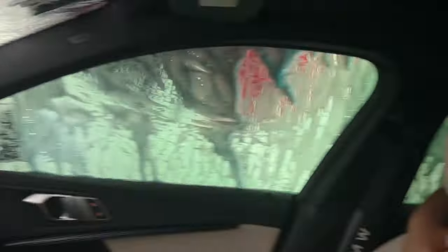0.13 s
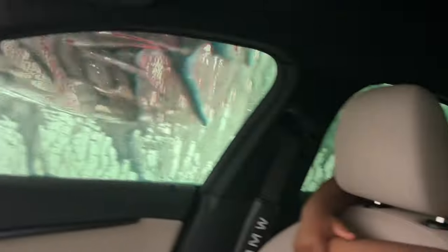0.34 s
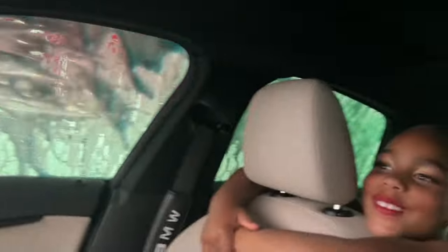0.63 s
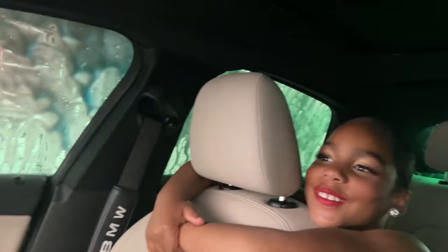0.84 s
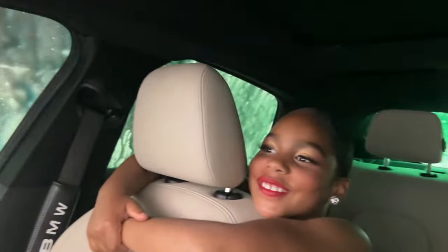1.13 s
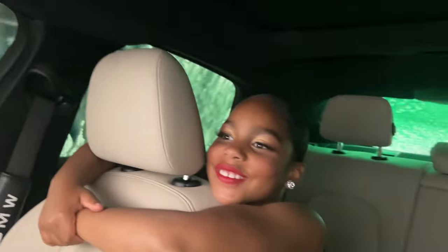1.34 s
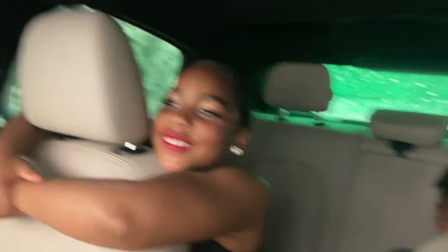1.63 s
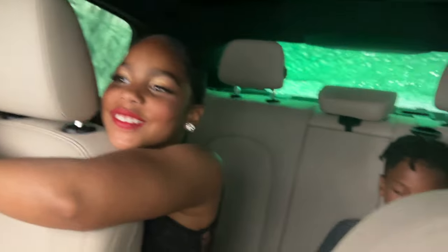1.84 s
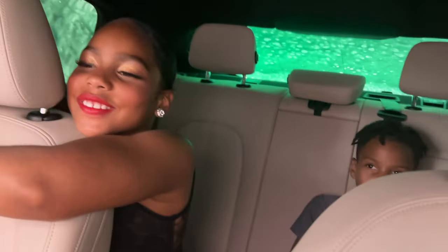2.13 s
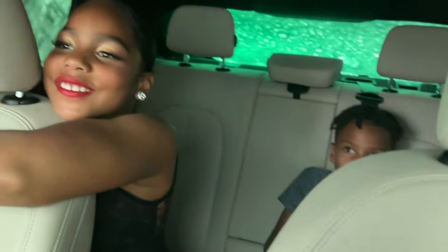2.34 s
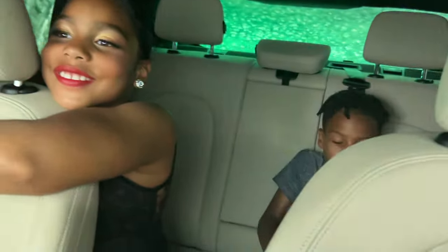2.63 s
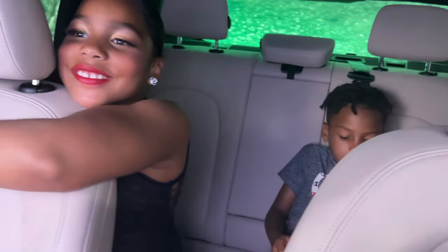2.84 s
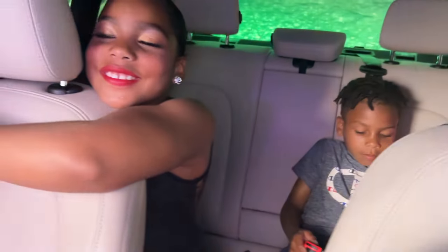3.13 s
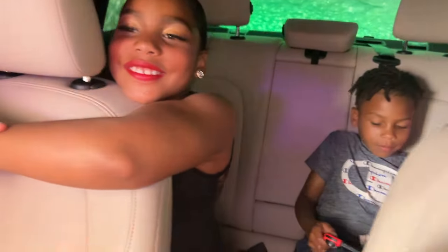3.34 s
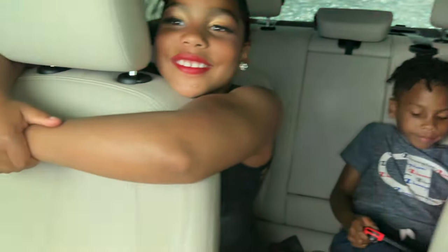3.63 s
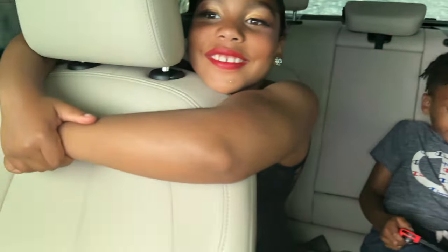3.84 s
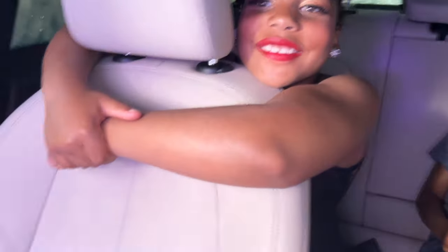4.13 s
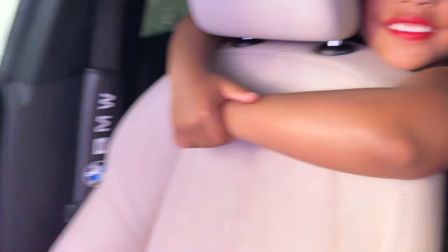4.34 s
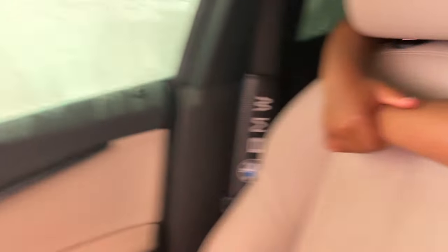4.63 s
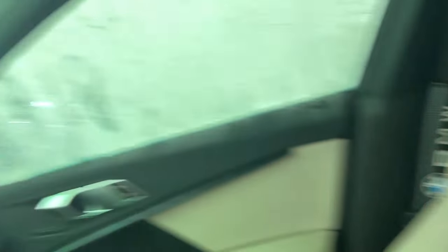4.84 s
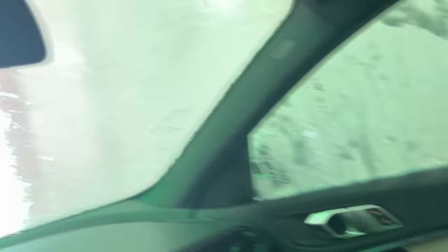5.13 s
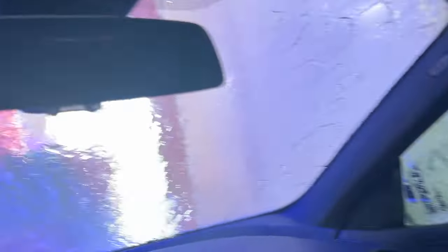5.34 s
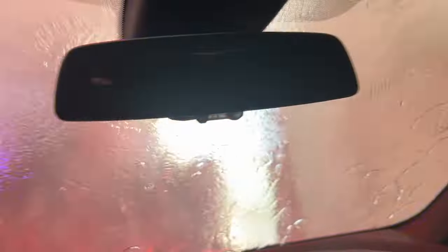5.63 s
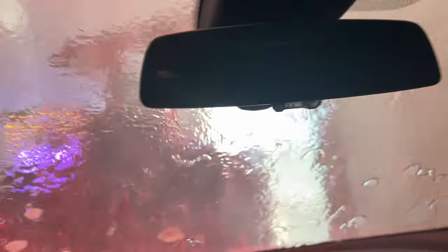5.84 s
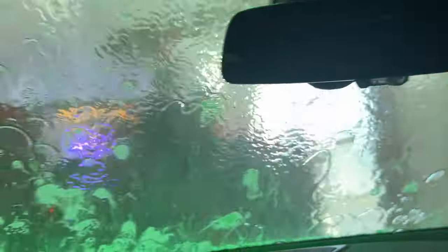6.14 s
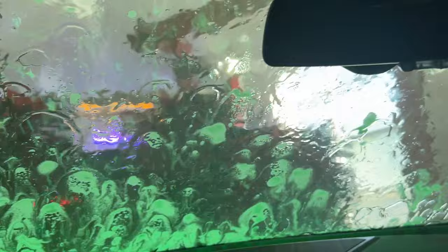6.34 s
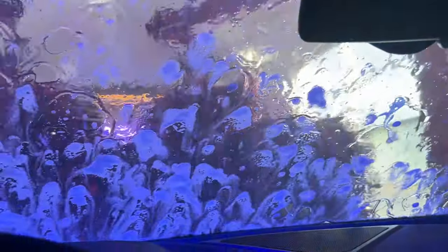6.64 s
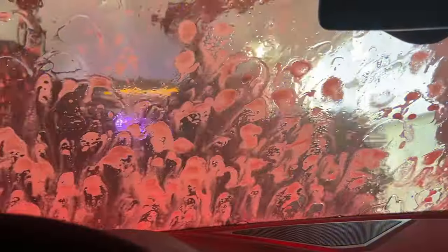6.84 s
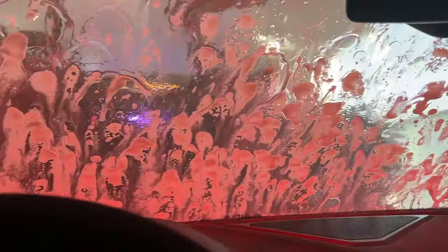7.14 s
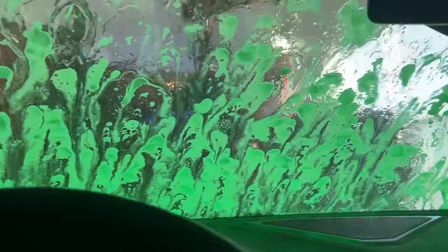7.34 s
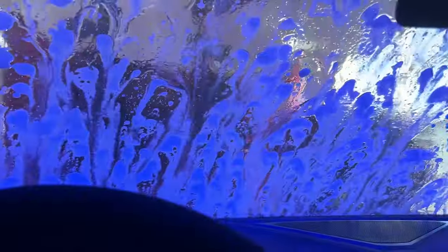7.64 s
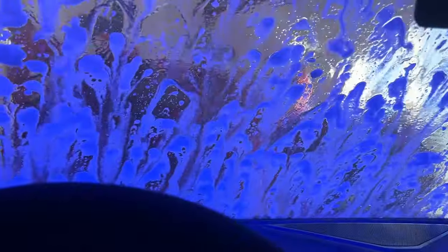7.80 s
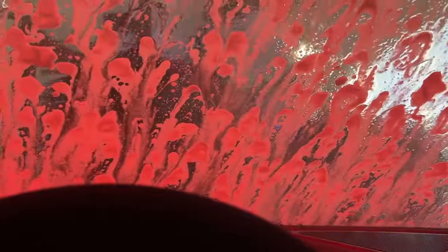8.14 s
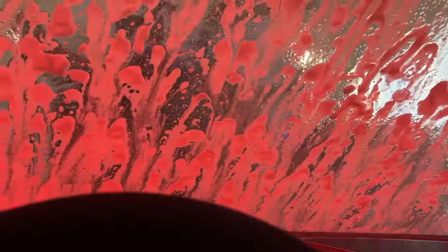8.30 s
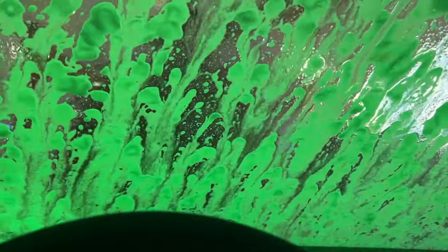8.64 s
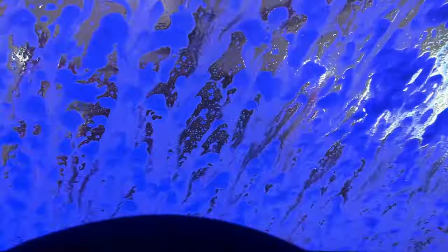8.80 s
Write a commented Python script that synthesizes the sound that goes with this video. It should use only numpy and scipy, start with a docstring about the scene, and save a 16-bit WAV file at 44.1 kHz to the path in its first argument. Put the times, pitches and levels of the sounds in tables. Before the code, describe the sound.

Close, enclosed car interior, handheld stereo microphone. Dull thuds of wet brushes open, then pulsing water jets rise and fall in a steady beat, with patter, splashes and fine hiss on the glass. An uneven motor-like hum sits underneath. Hollow resonant notes gather later, followed by more soft thumps, foam splats, tiny squeaks and a thin airy whistle on the left. The high hiss leans left.

```python
"""Inside a closed car in a wash tunnel, heard by a hand-held phone with two microphone ports that turns about.
Cloth slaps open over rumbling brushes (damped tones, filtered impacts); a side jet soon crosses the doors.
From 0.4 s spray sweeps the glass about once a second in dense random impacts, throbbing with the pump, whose
hum (multiples of its shaft rate) swells and breaks up, most strongly until 5.4 s. Hollow notes of narrow noise
start at 1.1 s and crowd near 5.7 s, with wet squeaks; slaps return at 6.1 s, then a foam nozzle whistles."""
import sys
import numpy as np
from scipy import signal
from scipy.fft import rfft, irfft, next_fast_len
from scipy.io import wavfile
from scipy.ndimage import uniform_filter1d, map_coordinates

SR = 44100
rng = np.random.default_rng(int(sys.argv[2]) if len(sys.argv) > 2 else 0)


def master_out(mix):
    """Clip the mix to full scale and print it as 16-bit PCM to the path in sys.argv[1]."""
    frames = np.transpose(np.atleast_2d(mix))
    ceiling = np.clip(frames, -1, 1)
    pcm = np.round(ceiling * 32767).astype(np.int16)
    wavfile.write(sys.argv[1], SR, pcm)


N = 395577

PUMP_HZ = 45.74  # mean shaft rate
# a swinging spray arm crosses the glass at a steady beat
FIRST_SWEEP_S, SWEEP_EVERY_S = 0.39, 1.02


def undb(db):
    """Amplitude ratio of a level difference: twenty decibels per factor of ten."""
    return 10 ** (np.asarray(db) / 20)


def unit(x):
    """Normalization to unit root-mean-square amplitude."""
    return x / np.sqrt(np.mean(x ** 2))


def curves(table):
    """Linear interpolation in time of every column after the first."""
    s, *columns = np.transpose(table)
    return [np.interp(np.arange(N) / SR, s, column) for column in columns]


def on_log(hz, table, column=1):
    """Interpolation of a table column along a logarithmic frequency axis."""
    points = np.array(table)
    return np.interp(np.log(np.maximum(hz, 1)), np.log(points[:, 0]), points[:, column])


def walk(rate):
    """Smoothed random modulation: levels held 1 / rate s, averaged twice; spread near 1."""
    held = int(SR / rate)
    steps = np.repeat(rng.standard_normal(N // held + 1), held)
    smooth = uniform_filter1d(uniform_filter1d(steps, held), held)
    return 1.333 * smooth[:N]


def pan(db):
    """Interchannel level difference: left minus right in dB, shared equally."""
    return undb(np.array([db, -db]) / 2)


def water(gain, drops_per_s, spread_db, flicker_db, flicker_rate, lag_s=None):
    """Shot noise of uneven impacts coloured by gain(hz), with partial coherence between the channels."""
    # f/Hz, coherence of the two channels (0-1), phase by which left leads/rad
    channel_likeness = [(40, 1, -0.091), (252, 0.8, 0.31), (513, 0.28, 0.51), (990, 0.16, 1),
                        (1850, 0, -1.14), (2960, 0.75, 1), (5500, 0.58, 0.67)]
    lagged_likeness = 0.97  # used when a time offset is given
    size = next_fast_len(N)
    hz = np.arange(size // 2 + 1) * SR / size
    hit = rng.random((2, N)) < drops_per_s / SR
    hit = hit * undb(spread_db * rng.exponential(size=(2, N)))
    mid, side = rfft(hit * rng.standard_normal((2, N)), size) * gain(hz)

    if lag_s:
        alike, lead = lagged_likeness, -2 * np.pi * hz * lag_s
    else:
        alike, lead = on_log(hz, channel_likeness), on_log(hz, channel_likeness, column=2)
    pair = np.sqrt(1 + alike) * mid + np.sqrt(1 - alike) * side * np.array([[1], [-1]])
    pair[0] *= np.exp(1j * lead)

    # overlapping octaves surge together and flicker alone
    power = np.abs(mid) ** 2
    octave = np.log2(np.maximum(hz, 1) / 30)
    surge = walk(flicker_rate)
    out = 0
    for k in range(10):
        share = np.cos(np.pi / 2 * np.clip(octave - k, -1, 1)) ** 2
        if np.sum(power * share) > 1e-3 * power.sum():  # skip nearly empty octaves
            flicker = flicker_db * (0.24 * surge + walk(1.5 * flicker_rate))
            out = out + irfft(pair * share, size)[:, :N] * undb(flicker)
    return unit(out)


def clumps(x, spread_db):
    """Spectro-temporal modulation: water lands in lumps, so patches of pitch and time swell and sink."""
    patch_hz, patch_s = 200, 0.028
    hz, t, spectrum = signal.stft(x, SR, nperseg=512)
    grid = np.meshgrid(hz / patch_hz, t / patch_s, indexing="ij")
    field = map_coordinates(rng.standard_normal((400, 1500)), grid, order=1, mode="wrap")
    return unit(signal.istft(spectrum * undb(spread_db * unit(field)), SR)[1][:, :N])


def ring(events, rise_s, t60_s, crack, sharpness, channels=2):
    """Damped resonance: each blow swells briefly, then a tone and noise in its band decay exponentially."""
    out, t = np.zeros((channels, N + SR)), np.arange(SR // 4) / SR
    shape = (1 - np.exp(-t / rise_s)) * np.exp(-np.log(1000) * t / t60_s)
    for s, db, hz in events:
        noise = rng.standard_normal((channels, len(t)))
        for _ in range(2):
            noise = signal.lfilter(*signal.iirpeak(hz, sharpness, fs=SR), noise)
        blow = (np.sin(2 * np.pi * hz * t) + crack * unit(noise)) / np.hypot(1, crack)
        start = int(s * SR)
        out[:, start:start + len(t)] += undb(db) * blow * shape
    return out[:, :N]


def band(hz, width_hz):
    """Narrow-band noise by quadrature modulation of a moving carrier; a narrow band holds as a tone."""
    held_hz = 11.7  # width at which the steady carrier has weight 1
    lowpass = signal.butter(2, width_hz / 2, fs=SR, output="sos")
    swing = unit(signal.sosfilt(lowpass, rng.standard_normal((2, N))))
    phase = 2 * np.pi * np.cumsum(hz) / SR
    return unit((swing[0] + (held_hz / width_hz) ** 2) * np.cos(phase) + swing[1] * np.sin(phase))


def glides(notes):
    """Frequency glides: each note swells, moves evenly in pitch and fades."""
    out = 0
    for s, length, first_hz, last_hz, width_hz, db in notes:
        along = np.clip((np.arange(N) / SR - s) / length, 0, 1)
        swell = np.sin(np.pi * along).clip(0) ** 0.28
        out = out + undb(db) * swell * band(first_hz + (last_hz - first_hz) * along, width_hz)
    return out


def hum(shaft, orders, waver_db, waver_rad):
    """Harmonic synthesis: multiples of the shaft rate waver in level and phase on their way through the body."""
    return sum(undb(db + waver_db * walk(8)) * np.sin(2 * np.pi * k * shaft + waver_rad * walk(5))
               for k, db in orders)


def pump(shaft):
    """Periodic forcing: three plungers on one shaft make its third multiple lead."""
    # multiple of shaft rate, relative level/dB
    plunger_orders = [(1, -21), (3, -1)]
    # the hum swells and breaks up: t/s, level/dB common to all multiples
    hum_level = [(0.0, -33.5), (1.62, -38), (1.87, -26), (1.92, -42), (2.02, -21), (2.22, -31),
                 (2.27, -49.5), (2.4, -25), (2.5, -28.5), (2.57, -45), (2.66, -24.5), (2.75, -33),
                 (2.82, -16.5), (3.0, -38.5), (3.05, -24), (3.4, -34), (3.62, -32.5), (3.7, -27),
                 (3.9, -23), (4.0, -42), (4.08, -26), (4.17, -38), (4.29, -29), (4.45, -38.5), (4.53, -25),
                 (4.6, -34.5), (4.94, -26.5), (5.04, -38), (5.12, -29), (5.27, -57), (5.32, -24.5),
                 (5.45, -43), (7.02, -37), (8.02, -42), (8.12, -30), (8.29, -37.5), (8.69, -37.5),
                 (8.82, -26), (8.97, -44)]
    db, = curves(hum_level)
    return np.sqrt(2) * hum(shaft, plunger_orders, 0.55, 0.48) * undb(db) * pan(-1.7)[:, None]


def brushes(pan_db):
    """Impact excitation: wet cloth beats a deep rumble from the shell and a duller roar from the doors."""
    # brushes on the body: t/s, deep rumble level/dB, door roar level/dB
    strokes = [(0.0, -20.5, -28), (0.3, -32.5, -26.5), (0.45, -29, -29), (0.95, -40, -26.5),
               (1.5, -33, -28.5), (2.2, -40, -28), (3.2, -34.5, -30), (4.2, -36, -29), (5.6, -33.5, -31),
               (6.15, -28.5, -30.5), (6.35, -29, -32), (7.15, -34, -31.5), (8.0, -35, -28.5),
               (8.97, -36.5, -31.5)]
    # spectrum of the shell: f/Hz, relative density level/dB
    body_colour = [(30, 6), (45, 10.5), (70, 9.5), (100, -1.5), (150, -18), (400, -60)]
    # spectrum of the doors: f/Hz, relative density level/dB
    door_colour = [(50, -19), (100, 2.5), (135, 2.5), (180, 0.5), (280, -11), (500, -7), (800, -19.5),
                   (1500, -21.5), (4000, -65)]
    # cloth slaps on the roof: t/s, level before the envelope/dB, f/Hz
    roof_slaps = [(0.008, -9, 325), (0.012, -11, 232), (0.138, -12, 95), (0.243, -12.5, 132),
                  (0.256, -13.5, 160), (0.284, -6.5, 80), (0.3, -10, 180), (0.302, -21, 320),
                  (0.318, -15, 129), (6.118, -13, 311), (6.246, -20, 80), (6.33, -10.5, 69),
                  (6.347, -11, 120), (6.519, -13, 125), (6.529, -11, 62), (6.554, -15, 360),
                  (6.752, -16, 99), (6.803, -14, 120), (6.97, -20, 110)]
    deep_db, doors_db = curves(strokes) + 1.2 * walk(14)  # both waver at the same moments
    deep = water(lambda hz: undb(on_log(hz, body_colour)), 3000, 2.2, 0.7, 9)
    doors = water(lambda hz: undb(on_log(hz, door_colour)), 6000, 1.43, 1.33, 9)
    slaps = ring(roof_slaps, 0.0018, 0.086, 0.24, 0.82)
    return undb(deep_db) * deep + undb(doors_db) * pan(pan_db) * doors + slaps


def splats(splash_gain):
    """Random damped impacts: stray lumps of water land at random, the higher ones weaker."""
    per_s, low_hz, octaves = 60, 480, 2.4
    top_db, spread_db = -1, 7.5  # relative to the splash, before the envelope
    when, size, pitch = rng.random((int(per_s * N / SR), 3)).T
    db = top_db - spread_db * size - 5.3 * octaves * pitch
    blows = zip(when * N / SR, db, low_hz * 2 ** (octaves * pitch))
    return splash_gain * ring(blows, 0.0099, 0.18, 0.9, 1.6)


def panel_notes():
    """Panel resonance: a hollow note glides or holds while the jet crosses a panel."""
    # start t/s, length/s, first f/Hz, last f/Hz, width/Hz, peak level/dB
    hollow_notes = [(1.1, 1.62, 270.8, 394.5, 38, -33.5), (1.75, 0.506, 365, 375, 32, -29),
                    (2.4, 0.276, 396, 380, 55, -31), (5.69, 0.178, 295, 355, 9, -24),
                    (5.64, 0.41, 276, 276, 5, -24), (5.66, 0.34, 230, 230, 5, -32),
                    (5.81, 0.2, 358, 374, 5, -23.5), (5.7, 0.46, 321, 321, 8, -31),
                    (6.18, 0.97, 355, 360, 53, -34.5), (6.2, 0.8, 960, 1010, 110, -39.5),
                    (5.6, 0.557, 500, 430, 55, -41), (6.9, 1.283, 560, 430, 100, -41.5)]
    return glides(hollow_notes)


def squeaks():
    """Brief narrow-band excitation: short wet squeaks of spray on the glass, stronger on the left."""
    # start t/s, length/s, first f/Hz, last f/Hz, width/Hz, peak level before panning/dB
    wet_notes = [(5.625, 0.047, 2110, 2100, 90, -41), (6.9, 0.11, 5800, 5560, 300, -50),
                 (6.99, 0.066, 4620, 4500, 250, -50), (7.54, 0.045, 1405, 1330, 400, -38.5),
                 (7.6, 0.043, 1230, 1190, 400, -36), (7.835, 0.05, 1454, 1460, 350, -37),
                 (7.89, 0.08, 1500, 1474, 500, -40.5), (7.99, 0.07, 6250, 6050, 250, -48),
                 (7.99, 0.05, 5350, 5250, 250, -50)]
    return glides(wet_notes) * pan(3)[:, None]


def nozzle(gain):
    """Narrow-band whistle: the foam nozzle sounds on the left around a wandering pitch."""
    return band(5760 * (1 + 0.022 * walk(6)), 500) * gain * pan(14.0)[:, None]


def bumps(starts, levels_db, shape):
    """Superposition of powers: a shape of (s, dB) points is laid down at each start."""
    t, (s, shape_db) = np.arange(N) / SR, np.transpose(shape)
    return sum(undb(2 * (db + np.interp(t - start, s, shape_db, left=-99, right=-99)))
               for start, db in zip(starts, levels_db))


def flow():
    """Incoherent power addition: steady water, sweeps and a side jet set the gains of every water layer."""
    # sweeps in turn: base level/dB of hiss, mist, patter, splash, wide panels, narrow panels;
    # last column: pump pulses relative to the drumming/dB, before a fixed lift
    sweep_levels = [(-52, -54, -47.5, -39.5, -46, -51, -12.5), (-49.5, -46, -52, -38, -45, -34, -6),
                    (-47.5, -42, -61, -50, -52, -40, -14), (-47, -41, -49, -41.5, -38, -54, -3),
                    (-43.5, -39, -41.5, -34, -33.5, -34.5, 0), (-45.5, -47, -38.5, -26, -25, -23.5, -12),
                    (-44, -48.5, -43.5, -34.5, -56, -34, 0.5), (-40.5, -44.5, -43, -38.5, -43.5, -40, 4),
                    (-43.5, -52, -46, -40.5, -42.5, -50, -11)]
    # water falling between sweeps: t/s, level/dB of hiss, mist, patter, splash, wide panels, narrow panels
    steady_levels = [(0.0, -59.5, -62, -46, -42.5, -31, -37), (1.3, -57.5, -64.5, -44, -36, -29.5, -34),
                     (3.3, -56.5, -57, -49, -38.5, -31.5, -66), (5.35, -51, -46, -43, -40.5, -33.5, -42),
                     (6.3, -52.5, -51, -44, -31.5, -33, -27.5), (7.3, -50.5, -50.5, -45.5, -39.5, -50, -51),
                     (8.97, -54, -49.5, -46.5, -41, -32, -53)]
    # Shapes of one sweep: t from its start/s, level added to the base/dB
    # fine spray swells and ebbs
    fine_shape = [(-0.2, -45), (-0.02, -11), (0.13, -5.5), (0.45, -2), (0.62, -5.5), (0.8, -19.5),
                  (1.05, -40)]
    # the solid jet lands and lifts sharply
    solid_shape = [(0.01, -8), (0.1, -2), (0.4, -1), (0.63, -2), (0.72, -25)]
    # the jet travels from the wide panels to the narrow ones, so the drumming climbs: first the wide
    wide_shape = [(-0.02, -16), (0.13, 8), (0.25, 1.5), (0.62, 1.5), (0.72, -20)]
    # then the narrow
    narrow_shape = [(0.02, -9), (0.11, -1.5), (0.42, -2), (0.63, -3.5), (0.72, -35)]
    # the nozzle's whistle
    whistle_shape = [(-0.1, -20), (0.2, -5), (0.48, -3), (0.6, -9), (0.75, -24)]
    # foam nozzle's whistle in each of the last sweeps: base level before panning/dB
    whistle_levels = [-56, -48, -65]

    starts = FIRST_SWEEP_S + SWEEP_EVERY_S * np.arange(len(sweep_levels))
    levels = np.transpose(sweep_levels)
    shapes = fine_shape, fine_shape, solid_shape, solid_shape, wide_shape, narrow_shape
    hiss, mist, patter, splash, wide, narrow = (
        undb(2 * db) + bumps(starts, level, shape)
        for db, level, shape in zip(curves(steady_levels), levels, shapes))

    # a side jet creeps along the doors and leaves them, reaching and leaving the wide panels first
    side_start_s, wide_lead_s = 0.51, 0.37
    rise_s, hold_s, fall_s = 1.354, 0.73, 0.34
    side = list(zip(np.cumsum([0, rise_s, hold_s, fall_s]), [-24.0, 2, 2.0, -12.5]))
    splash = splash + bumps([side_start_s], [-29], side)
    wide = wide + bumps([side_start_s - wide_lead_s], [-26], side)
    narrow = narrow + bumps([side_start_s], [-30.5], side)

    pulses = undb(np.interp(np.arange(N) / SR, starts + SWEEP_EVERY_S / 3, levels[-1]))
    whistle = bumps(starts[-len(whistle_levels):], whistle_levels, whistle_shape)
    return [*np.sqrt([hiss, mist, patter, splash, wide, narrow]), pulses, np.sqrt(whistle)]


def jet(shaft, pan_db, splash_gain, wide_gain, narrow_gain, pulses):
    """Forced modal vibration: the jet shakes panels at their modes and pump multiples, and splashes on glass."""
    # panel modes: f/Hz, width/Hz, relative level/dB
    panel_modes = [(225.5, 23, -5.5), (293.5, 54, 1.5), (391, 82, 1.5), (473, 45, -6.5)]
    # spectrum of the splash: f/Hz, relative density level/dB
    splash_colour = [(300, -38), (500, 3), (750, 10.5), (1000, 5.5), (1250, 1.5), (1600, -3.5), (1900, -19),
                     (4000, -46)]
    # resonances of the glass: f/Hz, width/Hz, lift of the level/dB
    glass_modes = [(724, 53, -1), (919, 17, 4), (1014, 18, 6.5), (1207, 30, 7), (1528, 14, 7)]
    # pump multiples in the drumming: multiple of shaft rate, relative level/dB
    pulse_orders = [(5, -16), (6, -7), (7, -12.5), (8, -7)]

    def peak(hz, f, width):
        """Lorentzian resonance curve with unit height."""
        return 1 / (1 + ((hz - f) / (width / 2)) ** 2)

    def panels(hz):
        """Modal sum of the panel resonances."""
        return sum(undb(db) * peak(hz, f, width) for f, width, db in panel_modes)

    def glass(hz):
        """Splash spectrum lifted by the resonances of the glass."""
        return undb(on_log(hz, splash_colour) + sum(db * peak(hz, f, width) for f, width, db in glass_modes))

    drum = water(panels, 6000, 2.0, 0.37, 12)
    shaken = drum + undb(2.5) * pulses * hum(shaft, pulse_orders, 1.2, 1.3)
    # wide panels carry the lower modes, narrow ones the upper
    wide = signal.sosfiltfilt(signal.butter(3, 286, fs=SR, output="sos"), shaken)
    narrow = shaken - wide
    splash = clumps(water(glass, 8000, 1.64, 0.51, 14), 1.86)
    return wide * wide_gain + narrow * narrow_gain + splash_gain * splash * pan(pan_db)


def spray(shaft, pan_db, hiss_gain, mist_gain, patter_gain):
    """Amplitude-modulated shot noise: hiss and mist jump in pressure once a pump turn, over steadier patter."""
    # Spectra: f/Hz, relative density level/dB
    # coarse drops
    patter_colour = [(700, -51), (1400, 2), (2200, 0.5), (3200, -5.5), (4500, -13), (9000, -49)]
    # fine spray
    hiss_colour = [(2000, -20), (3200, 0.5), (4500, 4), (6000, 3.5), (7200, -3.5), (9000, -62),
                   (14000, -74)]
    # finest spray
    mist_colour = [(4000, -27), (6500, -3.5), (7700, -1), (9000, -4.5), (11000, -6), (13000, -7),
                   (15500, -4)]
    # single drops ticking on the glass: t/s, level before the envelope/dB, f/Hz
    drop_ticks = [(.4449, -42, 6950), (.609, -42, 3800), (.803, -36, 2650), (1.1653, -38, 3500),
                  (1.965, -32.5, 2560), (2.974, -27, 1010), (3.033, -33, 1110), (3.09, -41, 4400),
                  (6.122, -30, 1540), (7.098, -33, 2500), (8.129, -44, 5600)]
    # gouts of foam landing on the windscreen: t/s, level before the envelope/dB, f/Hz
    foam_gouts = [(5.65, -27, 1690), (5.7, -26.5, 1490), (6.005, -32, 950), (6.11, -34, 1300),
                  (6.45, -25, 1100), (6.525, -23, 1270), (7.85, -34, 4000)]
    throb_depth, throb_turns = 0.35, 0.35  # jump in gain, and its decay in shaft turns
    throb = 1 + throb_depth * np.exp(-(shaft % 1) / throb_turns)
    patter = clumps(water(lambda hz: undb(on_log(hz, patter_colour)), 30000, 1.84, 0.63, 14), 1.64)
    hiss = clumps(water(lambda hz: undb(on_log(hz, hiss_colour)), 30000, 1.8, 1.24, 22), 1.26)
    # fine mist, nearly the same in both channels but slightly offset in time
    mist = water(lambda hz: undb(on_log(hz, mist_colour)), 27000, 0.64, 0.91, 22, lag_s=0.0002606)
    fine = hiss_gain * pan(pan_db) * hiss + mist_gain * mist
    ticks = ring(drop_ticks, 0.0012, 0.062, 5.0, 1.5)
    gouts = ring(foam_gouts, 0.011, 0.22, 8.0, 1.0)
    return patter_gain * patter + throb * fine + ticks + gouts


def scene():
    """Linear superposition of all sources, the pump shaft and the turning phone shared among them."""
    # the phone turns: t/s, left minus right level/dB for the lows, mids, highs
    phone_turn = [(0.0, 0.5, -1, 1.7), (2.05, -4.5, 2.5, 6.9), (4.42, -2, 1.5, 4.8), (5.84, 0.5, 1, 5),
                  (7.74, -0.5, -0.5, 7.9), (8.57, -0.5, -0.5, 8.9), (8.97, 0, -1.8, 6.3)]
    shaft = np.cumsum(PUMP_HZ * (1 + 0.004184 * walk(1.463))) / SR  # turns so far
    low, middle, high = curves(phone_turn)
    hiss, mist, patter, splash, wide, narrow, pulses, whistle = flow()
    background = pump(shaft) + brushes(low)
    details = splats(splash) + panel_notes() + squeaks() + nozzle(whistle)
    sweeps = jet(shaft, middle, splash, wide, narrow, pulses) + spray(shaft, high, hiss, mist, patter)
    return background + details + sweeps


def record(dry):
    """Band limitation: the phone drops the deepest bass and cuts the top."""
    bottom_hz, top_hz = 42, 15750
    thin = signal.sosfilt(signal.butter(3, bottom_hz, "high", fs=SR, output="sos"), dry)
    return signal.sosfilt(signal.ellip(10, .2, 80, top_hz, fs=SR, output="sos"), thin)


dry = scene()
out = record(dry)
master_out(out)
```